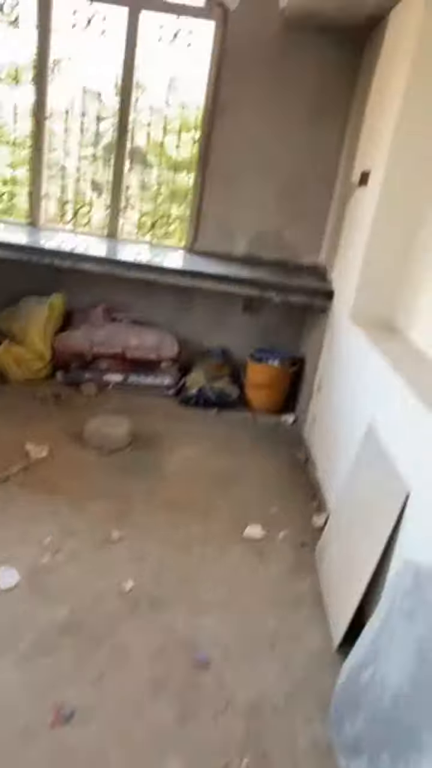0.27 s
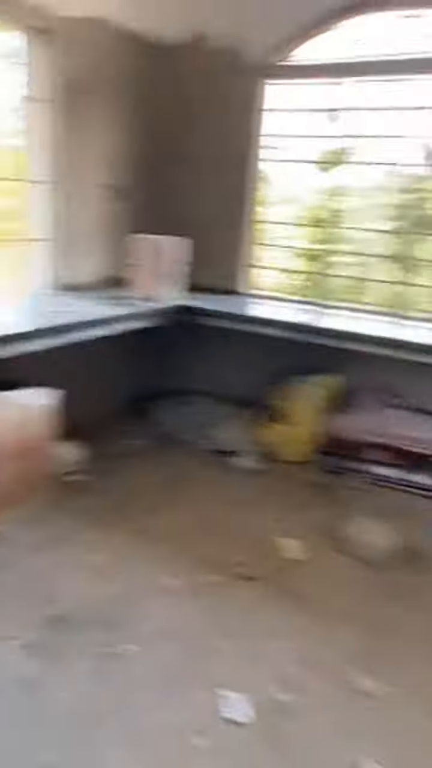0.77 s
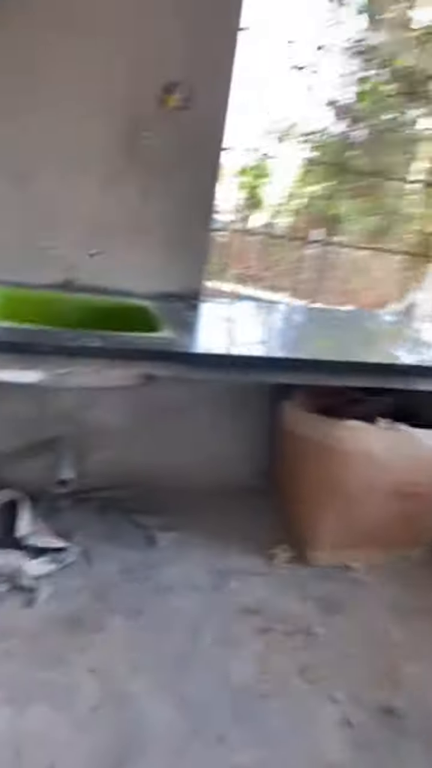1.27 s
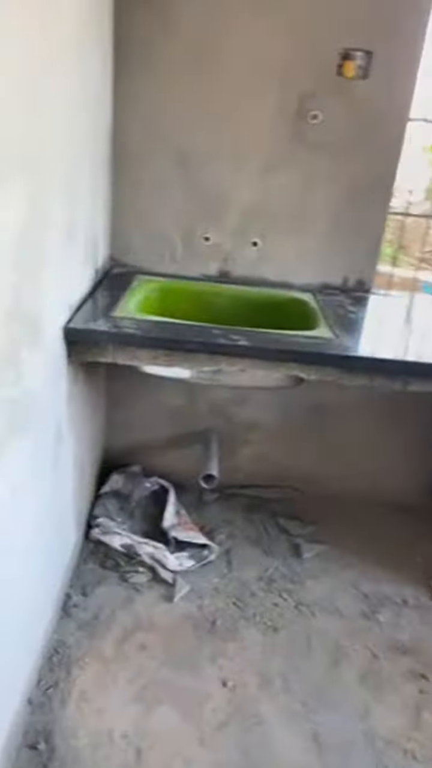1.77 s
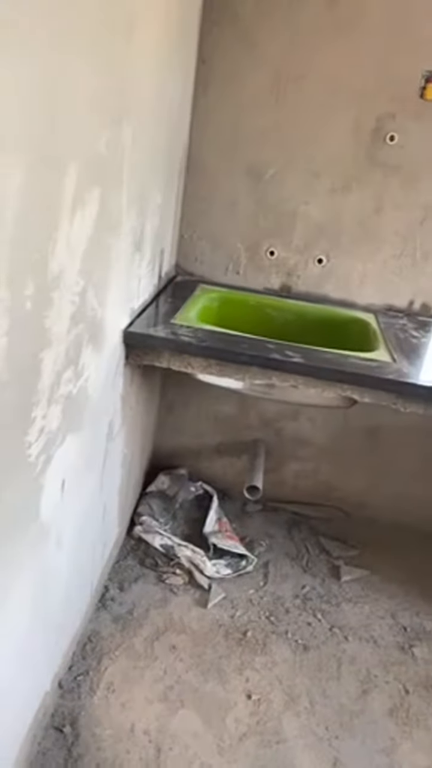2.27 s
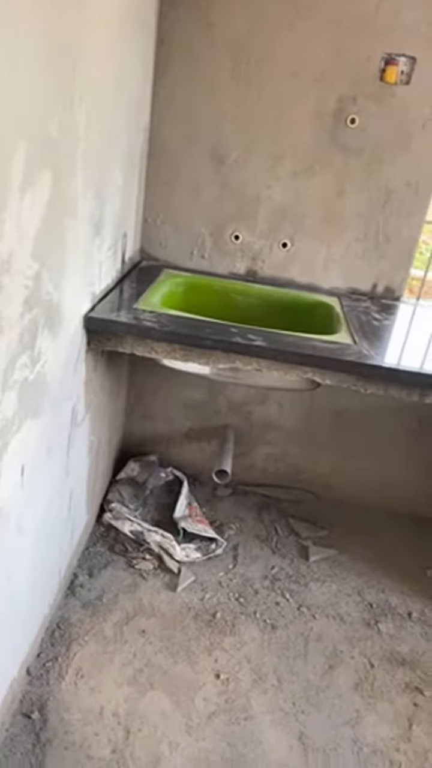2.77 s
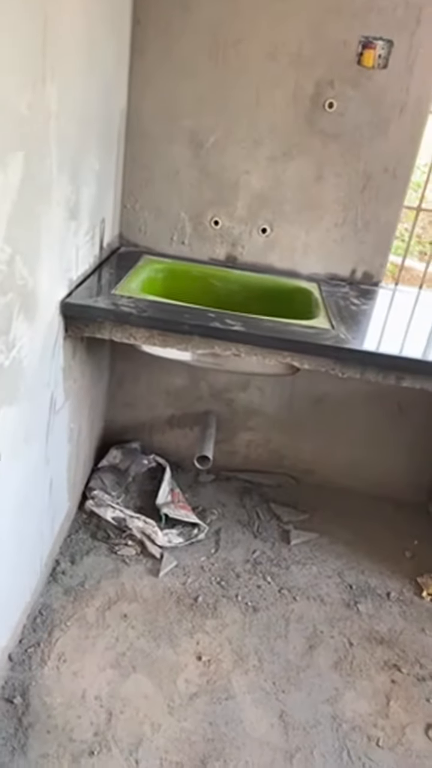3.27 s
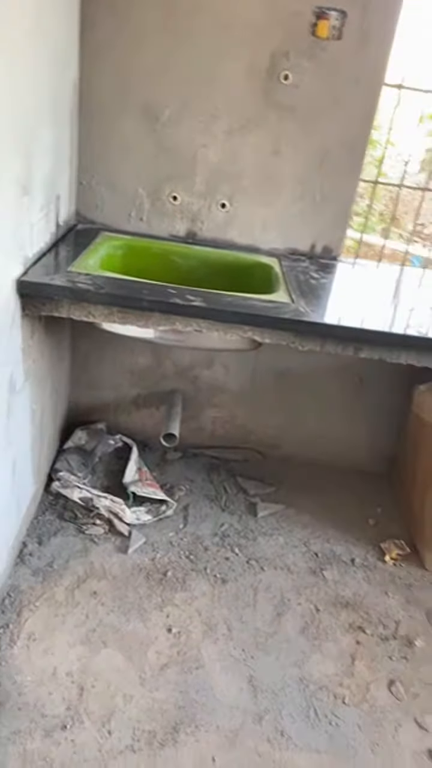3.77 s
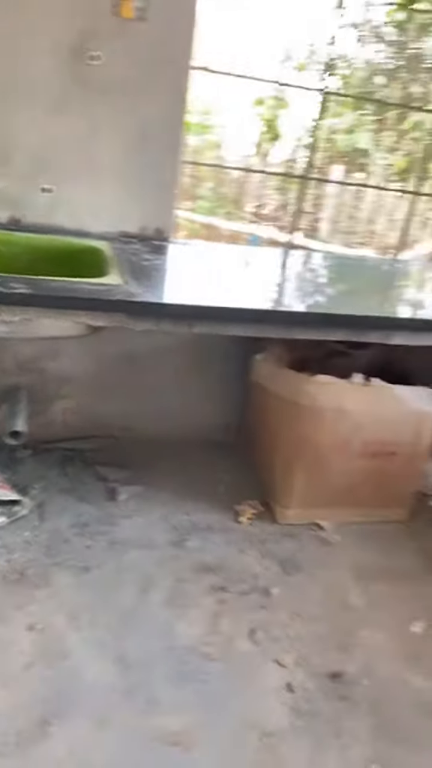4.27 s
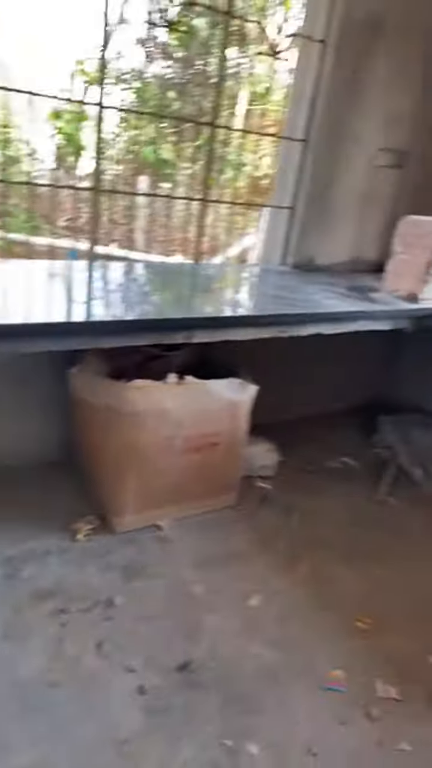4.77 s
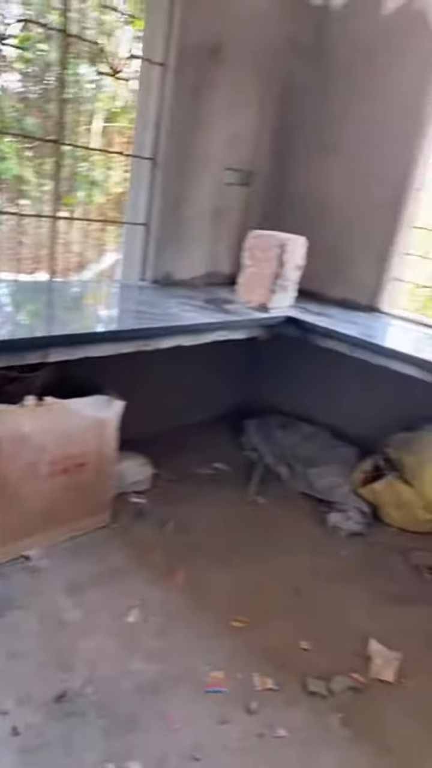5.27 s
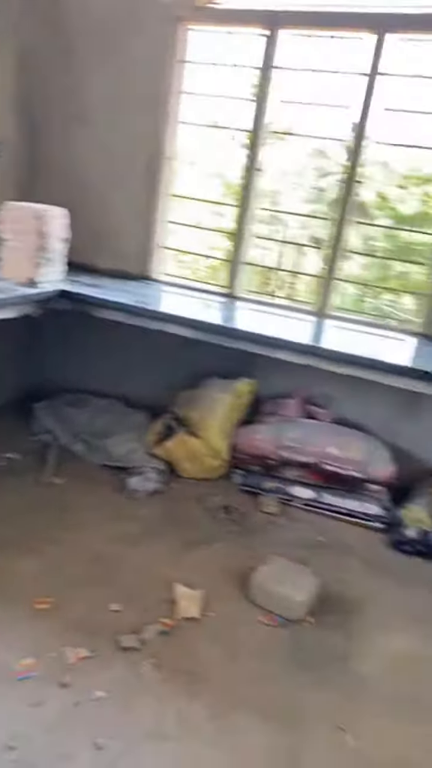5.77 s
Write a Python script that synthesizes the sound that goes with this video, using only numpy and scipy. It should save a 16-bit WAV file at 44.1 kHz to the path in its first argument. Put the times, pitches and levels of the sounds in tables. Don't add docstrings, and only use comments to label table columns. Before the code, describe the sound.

Handheld microphone in a bare, resonant unfinished kitchen: a rough, low truck hum rises in pitch and strength, with thin whines and a short loose rattle. The deep rumble thins as the microphone faces a corner. After several tiny clicks and gaps, the engine abruptly falls away for a gear change, then pulls again quietly, with dull knocks and faint insect ticking outside.

```python
import sys
import numpy as np
from scipy import signal
from scipy.io import wavfile
from scipy.ndimage import uniform_filter1d

SR = 44100
rng = np.random.default_rng(int(sys.argv[2]) if len(sys.argv) > 2 else 0)


def log_audio(samples):
    frames = np.atleast_2d(samples).T
    limited = np.clip(frames, -1, 1)
    pcm = np.round(limited * 32767).astype(np.int16)
    wavfile.write(sys.argv[1], SR, pcm)


def attenuation_scalar(level_db):
    decades = np.asarray(level_db, float) / 20
    return 10 ** decades


N = 264732
T = np.arange(N) / SR

# time_s, half_firing_rate_hz
SPEED = [
    (0, 43.86),
    (.8, 46.36),
    (2.24, 50.1),
    (2.9, 51.46),
    (3.53, 52.34),
    (3.7, 49.5),
    (4.0, 41.1),
    (4.2, 38.87),
    (6.01, 40.6),
]
# time_s, load_db, firing_beat_against_load_db
LOAD = [(0, -50.5, 1), (.23, -52, 11), (.33, -50, 3), (.62, -49, 0), (.8, -50, 3.5), (1.0, -47.5, -2),
        (1.44, -45.5, -3), (1.62, -46, 0), (1.8, -45.5, -4.5), (2.24, -46, -1), (2.42, -47, -2),
        (2.56, -46.5, 0.5), (3.05, -43, -5), (3.53, -45, 0), (3.58, -51, -7.5), (4.17, -55.5, -11.5),
        (4.32, -52, -3.5), (6.01, -56, 4.5)]
MAIN_DB = [-1.5, -0.5, -8.5]
# multiple, index_of_main_level_followed (whole part), level_against_it_db
MINOR = [(1, 0, -10.5), (3.5, -1, -15), (4.5, 2, -22), (5, -1, -23.5), (6, 2.2, -17.5)]
# start_s, end_s,
# multiple, level_db
SWELLS = [(0, .2, 12.2, -61), (.25, .75, 11.9, -57), (.78, 1.2, 11, -59), (1.8, 2.12, 9.6, -56),
          (2.08, 2.62, 8, -53), (2.6, 2.8, 9.9, -57), (2.7, 3.2, 10.9, -51), (2.9, 3.3, 6.75, -54),
          (3.15, 3.55, 12, -55), (2.8, 2.92, 26.75, -55), (2.91, 3.03, 26.7, -52), (3.05, 3.18, 26.6, -53),
          (3.25, 3.31, 26.9, -52), (3.04, 3.3, 24.9, -52), (3.31, 3.53, 28.8, -53),
          (3.05, 3.35, 23.95, -59), (2.5, 2.63, 27.6, -59), (2.68, 2.77, 27.7, -57),
          (2.95, 3.04, 29.6, -58), (3.09, 3.21, 29.85, -53), (3.2, 3.3, 23.4, -58), (3.23, 3.32, 28, -55),
          (2.84, 2.96, 23.7, -58), (1.95, 2.1, 11.9, -52), (1.98, 2.27, 10.85, -53), (1.63, 1.79, 9.7, -54),
          (2.38, 2.6, 9.65, -55), (3.0, 3.12, 14.1, -53), (2.9, 3.2, 10.05, -56), (3.26, 3.35, 8.35, -52),
          (3.3, 3.55, 5.2, -49), (2.98, 3.12, 5.3, -52), (.3, .47, 11.9, -54), (.84, .93, 16.3, -58),
          (3.1, 3.2, 27.6, -58), (1.38, 1.7, 15.6, -62), (5.5, 5.85, 5.05, -51)]
# center_hz, width_hz, lift_db
BOOM = [(81.5, 6.26, 10.5), (98.88, 3.3, 2.5), (104.5, 5.4, 13), (118.4, 3.9, 4), (139.9, 5.3, 7.5),
        (131.8, 3, -2), (149.5, 8.3, 5), (186.2, 9, 12.5), (198.5, 9.4, 8.5), (206.3, 6, 9)]
# frequency_hz, level_db (per Hz)
COLOUR = [(30, -48.5), (60, -13), (100, 2.5), (200, 2.5), (320, -7.5), (560, -11.5), (820, -16),
          (1430, -14.5), (2000, -23), (2700, -34), (3700, -47), (6000, -45.5), (10000, -54), (16000, -72.5)]
# center_hz, width_hz, level_against_roar_db
PANELS = [(505, 210, -15.5), (727, 21, -18.5), (1180, 350, -30.5), (1403, 510, -15)]
# start_s, end_s, pitch_hz, level_db
STRANDS = [(.35, .43, 1340, -55), (.5, .56, 1362, -51), (.62, .86, 1350, -57), (1.06, 1.2, 1560, -58),
           (1.0, 1.2, 1430, -57), (1.24, 1.46, 1420, -56), (1.33, 1.41, 1510, -54), (1.37, 1.45, 1590, -56),
           (1.68, 1.8, 1590, -54), (1.95, 2.02, 1480, -54), (2.05, 2.11, 1430, -54),
           (2.12, 2.19, 1470, -53), (2.2, 2.24, 1420, -55), (2.3, 2.52, 1370, -56), (2.53, 2.6, 1430, -52),
           (2.02, 2.06, 1110, -56), (4.14, 4.26, 1550, -61), (4.12, 4.33, 1500, -62),
           (4.18, 4.28, 1660, -63), (4.41, 4.53, 1480, -60), (4.4, 4.53, 1230, -63), (5.0, 5.13, 1470, -61),
           (5.0, 5.16, 1370, -64), (5.05, 5.2, 1280, -63), (5.33, 5.41, 1470, -60), (5.35, 5.5, 1650, -63),
           (5.35, 5.55, 1280, -64), (5.54, 5.63, 1480, -62), (3.62, 3.8, 1560, -60),
           (3.86, 3.97, 1580, -60), (3.66, 3.78, 1380, -61), (4.0, 4.14, 1480, -62), (3.64, 3.76, 720, -58),
           (3.84, 4.0, 720, -58), (4.2, 4.3, 950, -60), (3.98, 4.12, 1110, -63)]
# start_s, peak_db, low_hz,
# high_hz, t60_s
RATTLES = [(1.72, -43.5, 950, 1900, 1.1), (1.725, -53, 1800, 3100, .9), (3.545, -51, 800, 1800, .25),
           (.015, -60, 1900, 2300, 1.0), (.02, -67, 2400, 3400, .6), (.36, -66, 2700, 3400, 1.0),
           (.66, -64, 2400, 3200, .3), (3.04, -52, 1150, 1600, 1.6), (2.82, -55, 1050, 1350, 1.2),
           (3.541, -66, 3000, 14000, .08), (2.62, -53, 850, 1250, 1.5), (1.73, -72, 7500, 11000, .6)]
# start_s, peak_db, pitch_hz, t60_s
KNOCKS = [(1.729, -43, 1120, .09), (1.733, -41, 1330, .04), (1.73, -47, 2640, .06), (1.745, -41, 1480, .14),
          (1.767, -41, 2000, .05), (1.783, -42, 1350, .05), (1.808, -40, 1250, .07), (1.88, -45, 1100, .08),
          (5.247, -36, 290, .06), (5.337, -36, 215, .12), (5.597, -40, 202, .12), (5.673, -39, 194, .1),
          (4.5, -37, 221, .1), (4.318, -37, 183, .1), (5.32, -46, 640, .06), (3.542, -46, 1100, .08),
          (3.55, -46, 1600, .08), (3.552, -36, 195, .1), (1.746, -45, 1050, .06), (1.738, -43, 1700, .03),
          (1.757, -43, 1250, .04), (1.77, -44, 1150, .05), (1.778, -45, 1800, .05), (1.812, -45, 1650, .06),
          (1.826, -45, 1400, .1), (1.838, -46, 1600, .05), (1.746, -56, 3300, .04)]
NOTE_HZ = [176.8, 177.6, 202, 234, 250, 269.6, 368.6, 390, 100.5, 115.8, 79, 132.3]
# start_s, end_s, index_into_NOTE_HZ, level_db
NOTES = [(.16, .28, 1, -44), (.44, .62, 1, -50), (1.02, 1.32, 1, -46), (3.64, 3.84, 1, -47),
         (4.2, 4.42, 1, -51), (4.52, 4.72, 1, -51), (4.88, 5.28, 1, -51), (5.82, 6.1, 1, -49),
         (1.22, 1.45, 2, -50), (3.6, 3.8, 2, -50), (4.24, 4.56, 2, -51), (3.25, 3.5, 3, -46),
         (5.2, 5.3, 4, -54), (.45, .57, 5, -47), (.57, .76, 5, -53), (1.55, 1.88, 5, -48),
         (2.15, 2.45, 5, -50), (4.4, 4.6, 5, -54), (4.68, 4.82, 5, -51), (3.85, 4.1, 5, -56),
         (4.95, 5.15, 5, -55), (5.68, 5.78, 2, -50), (4.42, 4.56, 9, -53), (2.85, 3.4, 1, -50),
         (.05, .48, 6, -60), (1.5, 1.88, 6, -49), (4.6, 4.92, 6, -50), (4.25, 4.5, 6, -58),
         (3.85, 4.3, 6, -59), (5.15, 5.36, 7, -54), (3.63, 3.73, 8, -45), (.17, .31, 11, -44),
         (4.88, 5.2, 9, -52), (4.26, 4.46, 10, -47), (.92, 1.02, 7, -51), (.28, .42, 6, -55),
         (3.95, 4.25, 9, -51)]
# time_s, level_db
CHORUS = [
    (0, -67),
    (.9, -68),
    (1.4, -69.5),
    (1.95, -64.5),
    (2.3, -71.5),
    (3.5, -69),
    (4.1, -74.5),
    (4.8, -70),
    (6.01, -82),
]
# start_s, end_s, body_hz, level_db
BOUTS = [(.82, .92, 4500, -74), (.94, 1.0, 4520, -74), (1.09, 1.15, 4520, -73), (1.25, 1.37, 4540, -73),
         (1.85, 1.9, 4400, -71), (4.75, 4.89, 4460, -75), (4.9, 4.97, 4440, -74), (4.61, 4.66, 4430, -75),
         (5.16, 5.28, 4400, -76), (4.43, 4.51, 4220, -77), (5.03, 5.08, 5120, -71), (5.0, 5.08, 4600, -76),
         (5.1, 5.13, 4200, -75), (4.96, 5.02, 5950, -78), (4.5, 4.57, 5880, -80), (4.76, 4.85, 5900, -81)]
# start_s, end_s, body_hz, level_db
HIGH_BOUTS = [(.85, .95, 9270, -86), (1.04, 1.24, 8870, -85), (1.05, 1.22, 9240, -87),
              (1.27, 1.47, 9250, -81), (1.3, 1.6, 9060, -84), (1.68, 1.85, 9150, -81),
              (1.86, 2.0, 9310, -82), (2.04, 2.16, 9120, -84), (2.07, 2.22, 9310, -81),
              (2.4, 2.6, 9150, -84), (4.44, 4.58, 8810, -88), (4.73, 4.92, 8870, -86),
              (4.41, 4.5, 8620, -84), (4.39, 4.56, 8990, -86), (4.74, 4.97, 8700, -83),
              (4.7, 4.99, 9070, -86), (5.04, 5.16, 8600, -84), (5.06, 5.3, 8980, -87),
              (5.3, 5.44, 8230, -88), (5.33, 5.4, 8960, -86), (5.08, 5.3, 8800, -86),
              (5.3, 5.45, 8600, -89)]
# start_s, end_s, level_db
CICADA = (2.71, 3.13, -74.5)
# start_s, length_s, body_hz, level_db
THROBS = [(4.639, 0.024, 4450, -64), (4.67, 0.022, 4160, -75), (4.76, 0.013, 4400, -70),
          (4.777, 0.017, 4440, -63), (4.813, 0.039, 4440, -64), (4.86, 0.024, 4430, -71),
          (4.914, 0.04, 4440, -65), (5.142, .02, 4390, -69), (5.169, 0.019, 4400, -68),
          (5.197, 0.028, 4400, -66), (5.218, 0.042, 4400, -63), (5.243, 0.027, 4470, -71),
          (5.285, .018, 4400, -77), (5.366, 0.018, 4410, -62), (5.399, 0.016, 4400, -71),
          (5.435, .04, 4410, -72), (4.958, .014, 4430, -70), (5.907, .016, 8000, -71),
          (5.855, 0.022, 7250, -75), (5.947, .03, 7340, -76), (5.98, .008, 7000, -70)]
# frequency_hz, level_db (per Hz)
AIR = [(40, -42.5), (70, 5), (145, -5.5), (230, -0.5), (360, -4), (600, -13.5), (1500, -20), (2400, -32),
       (3500, -36.5), (4500, -37), (7500, -39.5), (9500, -45.5), (12000, -51), (16000, -79)]
# time_s, share_left
RUMBLE = [
    (0, 1),
    (1.5, 1),
    (1.75, 0.41),
    (3.5, .45),
    (3.65, 0.96),
    (6.01, .8),
]
# start_s, silence_s, step_at_both_edges, step_at_catch_up (full scale = 1)
STALLS = [
    (1.4605, .016, .0135, -.011),
    (1.6395, .003, -.0175, -.034),
    (2.2195, .003, -.004, -.05),
    (2.5195, .007, -.006, -.013),
    (3.5195, 0, 0, .015),
]
# time_s, lost_s
LOST = (3.5395, .0038)

TICKS_PER_S, THROBS_PER_S = 190, 28
FLUTTER_DB = 2


def exhaust(turns, levels_db):
    lines = [(2, 0, 0), (3, 1, 0), (4, 2, 0)] + MINOR
    out = sum(tone(k * turns, levels_db[int(c)] + db) for k, c, db in lines)
    for start, end, k, db in SWELLS:
        part, swell = bloom(start, end)
        strand = tone(k * turns[part], db, T[part], .005 * k, 1.8)
        out[part] += swell * flutter(T[part], FLUTTER_DB * k / 27) * strand
    return out


def multiples(hz, beat_db):
    def lift(f):
        gain = attenuation_scalar(-11)
        for mid, width, db in BOOM:
            gain = gain + attenuation_scalar(db) / (1 + (1.144 * (f - mid) / width) ** 2) ** 2
        return gain

    return [beat_db + db + 20 * np.log10(lift((k + 2) * hz)) for k, db in enumerate(MAIN_DB)]


def roar(turns, level_db, bright_db):
    pulse = 1 + 0.12 * np.cos(4 * np.pi * turns) + 0.13 * np.cos(6 * np.pi * turns)
    puffs = patchy(0.93) * pulse
    wide = coloured(puffs, COLOUR)
    top = signal.sosfilt(signal.butter(2, 900, "high", fs=SR, output="sos"), wide)
    ring = sum(attenuation_scalar(db) * ringing(puffs, hz, width) for hz, width, db in PANELS)
    return attenuation_scalar(level_db) * (attenuation_scalar(5.0) * (wide + (attenuation_scalar(bright_db) - 1) * top) + ring)


def whine():
    out = np.zeros(N)
    for start, end, hz, db in STRANDS:
        part, swell = bloom(start, end)
        turns = hz * T[part] + .1 * wander(.006, T[part])
        out[part] += swell * flutter(T[part], FLUTTER_DB) * tone(turns, db - 3, T[part], .25, 2.2)
    return out


def rattles():
    out = np.zeros(N)
    clumps = rng.standard_normal(N) * attenuation_scalar(3.0 * wander(.005))
    for start, db, low_hz, high_hz, t60 in RATTLES:
        part = slice(round(start * SR), round((start + t60) * SR))
        u = T[part] - T[part][0]
        band = signal.butter(3, [low_hz, high_hz], "band", fs=SR, output="sos")
        ring = evened(signal.sosfilt(band, clumps[part]))
        out[part] += attenuation_scalar(db - 60 * u / t60) * np.minimum(u / (0.037 * t60), 1) * ring
    return out


def knocks():
    out, u = np.zeros(N), T[:SR // 5]
    for start, db, hz, t60 in KNOCKS:
        envelope = attenuation_scalar(db - 60 * u / t60) * np.minimum(u / 0.0024, 1)
        out[round(start * SR):][:len(u)] += envelope * np.sin(2 * np.pi * hz * u)
    return out


def room_notes():
    out = np.zeros(N)
    for start, end, note, db in NOTES:
        part, swell = bloom(start, end)
        out[part] += swell * tone(NOTE_HZ[note] * T[part], db, T[part], .04, 1.6)
    return out


def insects():
    low_db = curves(CHORUS)[0] + .8 * wander(0.13)
    fizz = rng.standard_normal(N) * attenuation_scalar(3.4 * wander(0.012))
    out = attenuation_scalar(low_db - 7.5 + 2.2 * wander(0.045)) * ringing(fizz, 4620, 960)
    out += attenuation_scalar(low_db - 9) * chirps(count=500, low_hz=4150, high_hz=5000)
    out += attenuation_scalar(low_db - 12) * chirps(count=1400, low_hz=5000, high_hz=8300)
    out += attenuation_scalar(low_db - 9) * chirps(count=600, low_hz=2100, high_hz=3400)

    throb_turns = THROBS_PER_S * T + .1 * wander(.1)
    throb = attenuation_scalar(2.5 * wander(.012) + 4 * np.cos(2 * np.pi * throb_turns) - .5)
    high = np.full(N, attenuation_scalar(-95))
    for rows, side_db, join in ((BOUTS, -13, 0), (HIGH_BOUTS, -10, attenuation_scalar(4.5))):
        for start, end, hz, db in rows:
            part, swell = bloom(start, end)
            ticks = 0
            for k in range(-2, 3):
                line_turns = (hz + k * TICKS_PER_S) * T[part] + rng.random()
                ticks = ticks + attenuation_scalar(side_db * abs(k)) * np.cos(2 * np.pi * line_turns)
            out[part] += attenuation_scalar(db) * swell * throb[part] * ticks
            high[part] += join * attenuation_scalar(db) * swell

    start, end, cicada_db = CICADA
    part, swell = bloom(start, end)
    out[part] += attenuation_scalar(cicada_db) * swell ** 1.49 * ringing(fizz, 9900, 420)[part]
    return out + attenuation_scalar(-13.0) * high * ringing(fizz, 9000, 870)


def throbs():
    out = np.zeros(N)
    for start, length, hz, db in THROBS:
        u = T[:round(length * SR)]
        ticks = 1 + 0.27 * np.cos(2 * np.pi * (TICKS_PER_S * u + rng.random()))
        throb = np.sin(np.pi * u / length) * ticks * np.sin(2 * np.pi * hz * u)
        out[round(start * SR):][:len(u)] += attenuation_scalar(db) * throb
    return out


def chirps(count, low_hz, high_hz):
    out = np.zeros(N + SR)
    for start, pitch, length, size in rng.random((count, 4)):
        u = np.arange(round((0.018 + 0.024 * length) * SR))
        hz = low_hz + (high_hz - low_hz) * pitch
        note = np.hanning(len(u)) * np.sin(2 * np.pi * hz * u / SR)
        out[round(start * N):][:len(u)] += attenuation_scalar(-12 * size) * note
    return evened(out[:N])


def outdoor_air():
    level = attenuation_scalar(-48.5 + 1.0 * wander(0.037) + 1.02 * wander(.012))
    return level * coloured(patchy(2.28), AIR)


def thinned(x):
    deep = signal.sosfiltfilt(signal.butter(3, 115, fs=SR, output="sos"), x)
    return x - (1 - np.clip(curves(RUMBLE)[0], 0, 1)) * deep


def evened(x):
    return x / np.sqrt(np.mean(x ** 2) + 1e-20)


def curves(rows):
    s, *columns = np.transpose(rows)
    return [np.interp(T, s, c, c[0], c[-1]) for c in columns]


def wander(span_s, t=T):
    size = max(round(span_s * SR / 64), 2)
    slow = rng.standard_normal(N // 64 + 2)
    slow = uniform_filter1d(uniform_filter1d(slow, size), size)
    return np.interp(t, np.arange(len(slow)) * 64 / SR, evened(slow))


def flutter(t, depth_db):
    return attenuation_scalar(depth_db * wander(.008, t) - .12 * depth_db ** 2)


def bloom(start, end):
    part = slice(max(round(start * SR), 0), round(end * SR))
    return part, np.sin(np.pi * np.clip((T[part] - start) / (end - start), 0, 1)) ** 0.29


def tone(turns, level_db, t=T, drift=0.0038, waver_db=1.06):
    level = np.sqrt(2) * attenuation_scalar(level_db + waver_db * wander(0.075, t))
    return level * np.cos(2 * np.pi * (turns + rng.random() + drift * wander(0.033, t)))


def resonate(x, hz, width):
    turn = np.exp(2j * np.pi * np.cumsum(hz * np.ones(N)) / SR)
    r = np.exp(-np.pi * width / SR)
    return 2 * (turn * signal.lfilter([1 - r], [1, -r], x / turn)).real


def ringing(x, hz, width):
    return evened(resonate(resonate(x, hz, width), hz, width))


def coloured(x, points):
    f, db = np.transpose(points)
    hz = abs(np.fft.fftfreq(8192, 1 / SR))
    log_gain = np.log(attenuation_scalar(np.interp(np.log(hz + 1), np.log(f), db)))
    taps = np.fft.ifft(np.exp(np.conj(signal.hilbert(log_gain)))).real[:4096]
    return evened(signal.oaconvolve(x, taps)[:N])


def patchy(patchy_db):
    a, b, patches = rng.standard_normal((N // 128 + 5, 257, 3)).T
    patches = evened(uniform_filter1d(uniform_filter1d(patches, 8, 0), 16, 1))
    spectrum = (a + 1j * b) * attenuation_scalar(patchy_db * patches)
    return evened(signal.istft(spectrum, nperseg=512, noverlap=384)[1][:N])


def scene():
    hz = curves(SPEED)[0]
    load_db, beat_db = curves(LOAD)
    lost_at, lost_s = LOST
    turns = np.cumsum(hz) / SR + hz * lost_s * (T > lost_at)
    bright_db = 2 + 0.27 * beat_db
    noise = thinned(outdoor_air() + roar(turns, load_db, bright_db))
    engine = exhaust(turns, multiples(hz, load_db + beat_db)) + whine()
    load = rattles() + knocks()
    return (engine + load + room_notes() + insects() + throbs() + noise)[None]


def stalled(x):
    catch_up_s = .02
    settle = np.exp(-np.arange(130) / 50)
    out = x.copy()
    for start, silence, edge, skip in STALLS:
        a, b, c = (round(s * SR) for s in (start, start + silence, start + silence + catch_up_s))
        out[a:b] = 0
        out[b:c] = x[a:a + c - b]
        if silence:
            out[a - 130:a] -= (edge + out[a - 1]) * settle[::-1]
            out[b:b + 130] -= (edge + out[b]) * settle
        miss = .5 * (skip - out[c] + out[c - 1])
        out[c - 130:c] -= miss * settle[::-1]
        out[c:c + 130] += miss * settle
    thump = .008 * np.hanning(round(.016 * SR))
    out[round(LOST[0] * SR) - len(thump) // 2:][:len(thump)] += thump
    return out


def roll_off(x):
    return signal.sosfilt(signal.butter(12, 16650, fs=SR, output="sos"), x)


def record(dry):
    hissy = dry[0] + attenuation_scalar(-85) * rng.standard_normal(N)
    cut = signal.sosfilt(signal.butter(5, 60, "high", fs=SR, output="sos"), hissy)
    band_limit = signal.firwin(511, 15850, window=("kaiser", 9), fs=SR)
    out = signal.oaconvolve(stalled(cut), band_limit, "same")
    out *= np.sin(.5 * np.pi * np.minimum((T[-1] - T) / .004, 1)) ** 2
    return roll_off(out[None])


dry = scene()
out = record(dry)
log_audio(out)
```